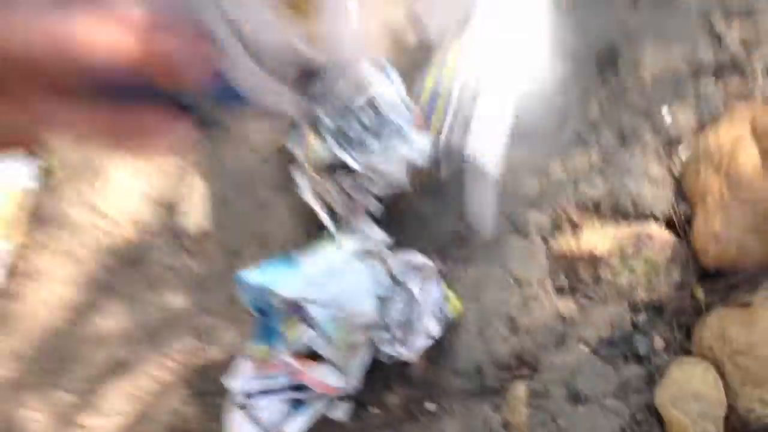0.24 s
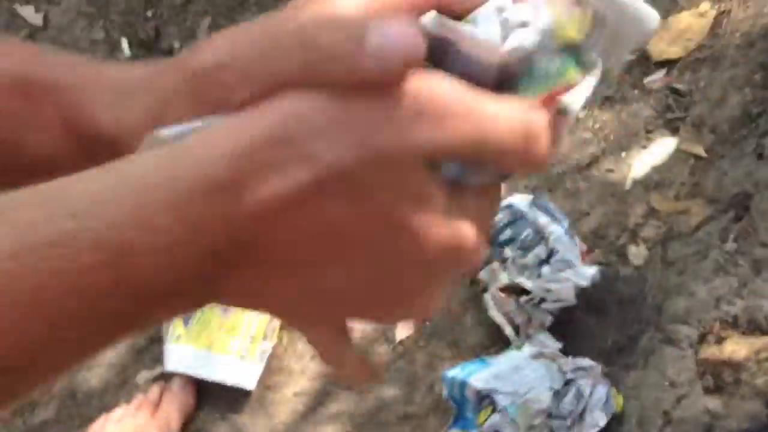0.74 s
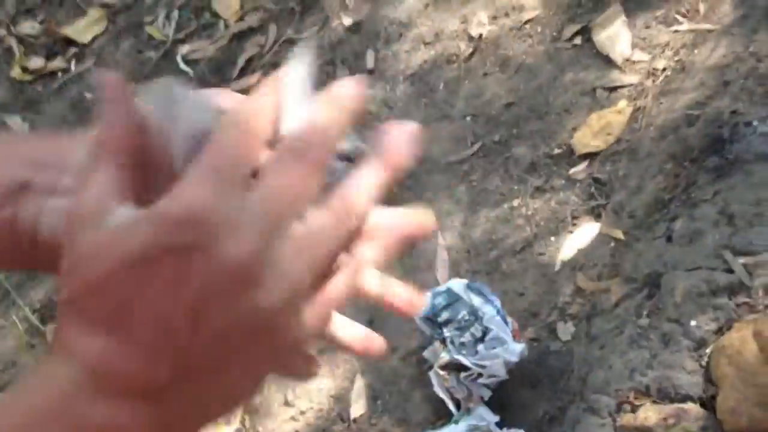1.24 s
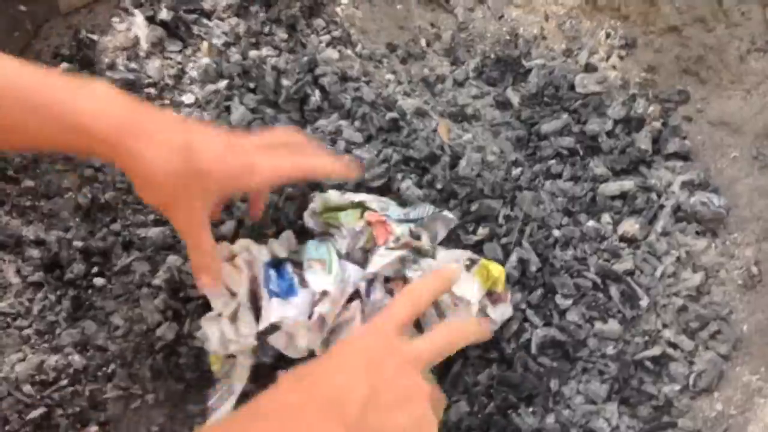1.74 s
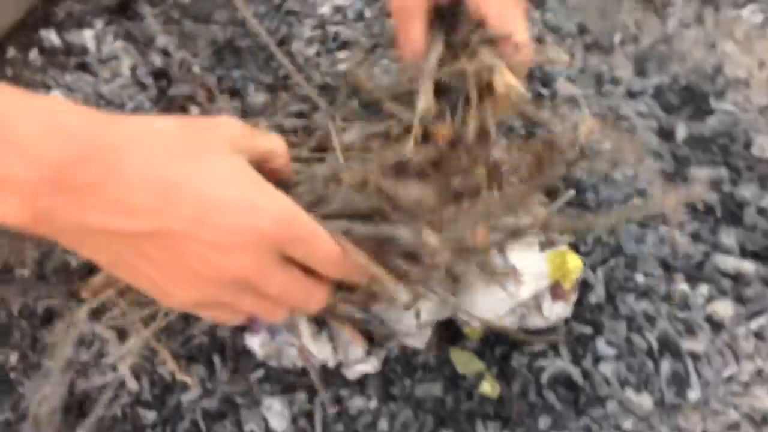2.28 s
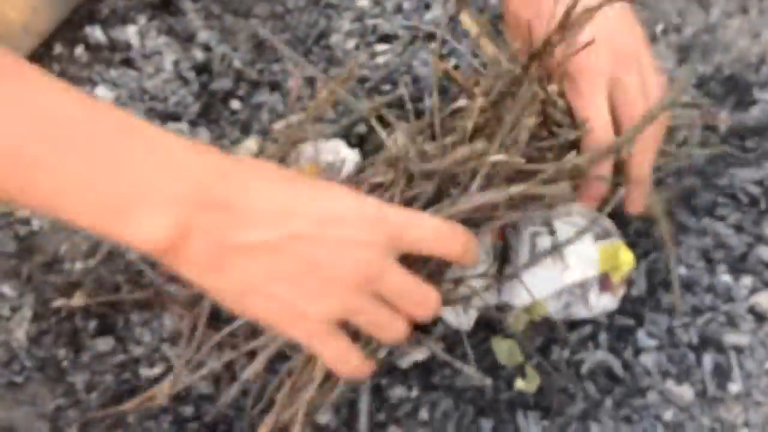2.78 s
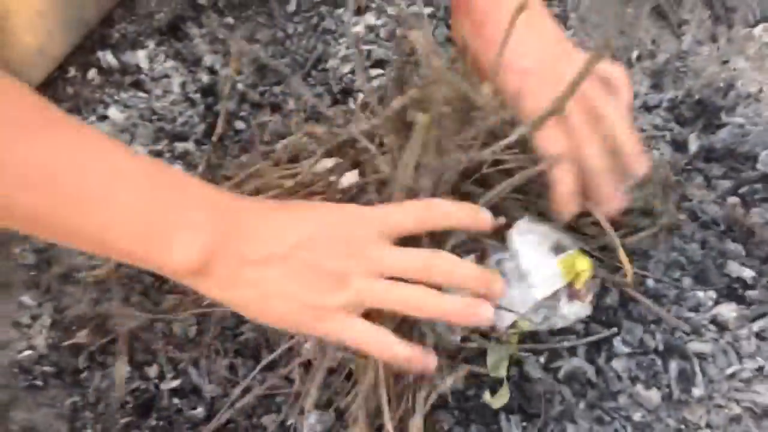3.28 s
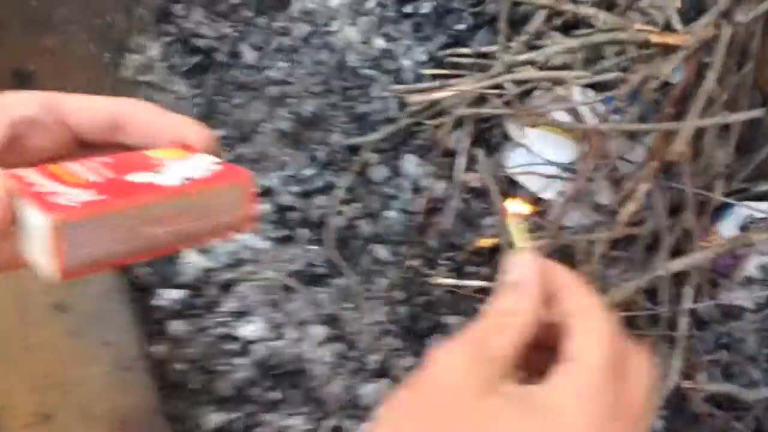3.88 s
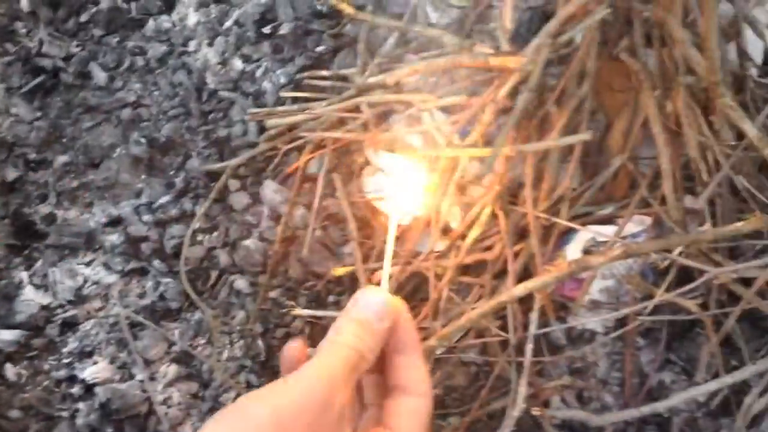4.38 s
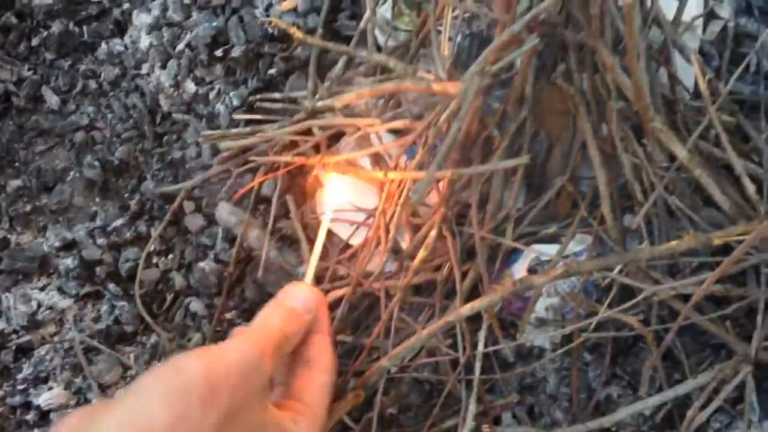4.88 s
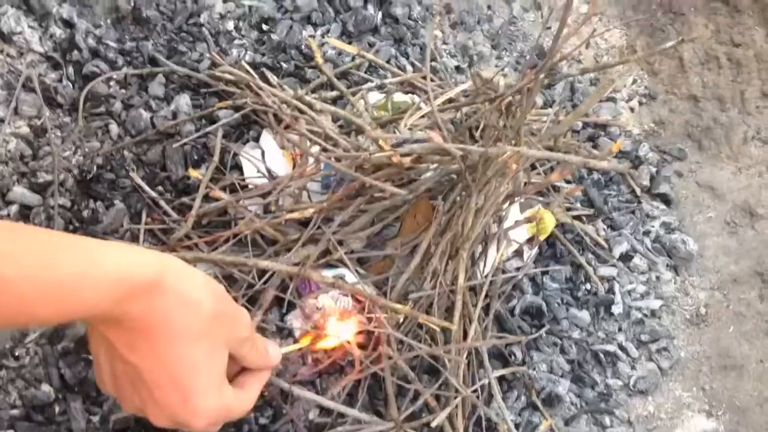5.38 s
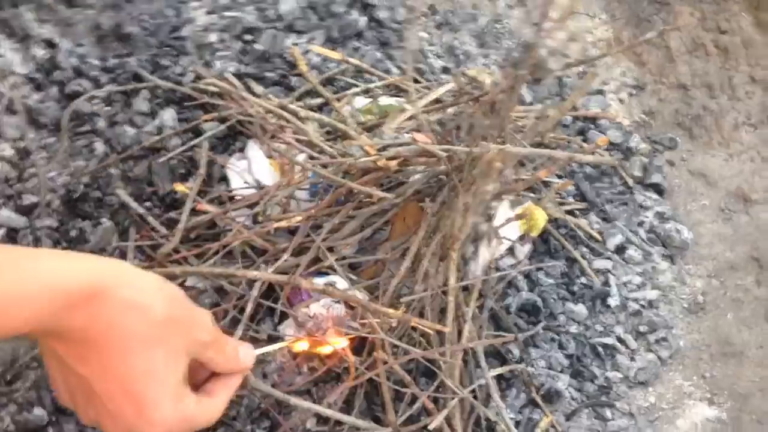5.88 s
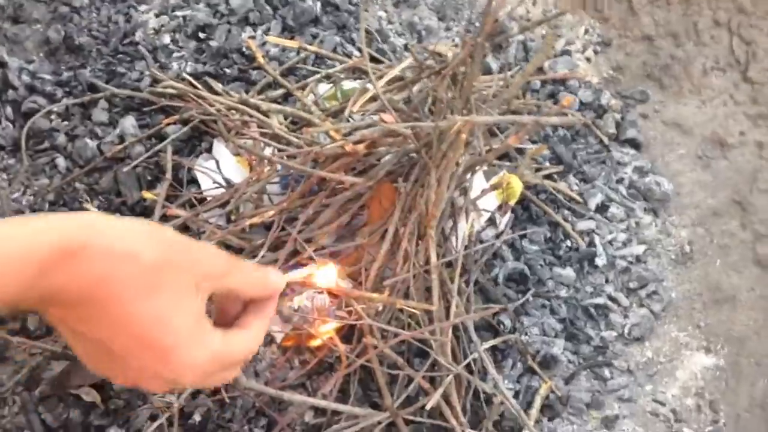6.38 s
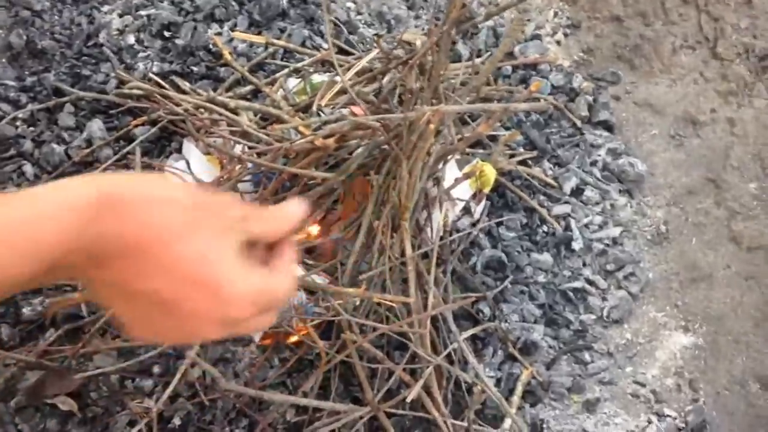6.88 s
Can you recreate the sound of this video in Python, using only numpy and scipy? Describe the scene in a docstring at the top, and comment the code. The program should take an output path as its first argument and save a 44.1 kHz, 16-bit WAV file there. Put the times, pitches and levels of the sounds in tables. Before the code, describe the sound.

Hands crush paper in loud, snapping bursts, then nudge it with a softer rustle. Dry twigs are heaped on top, rubbing and cracking. A match scrapes once across its cardboard box, loose matches knock, and the young flame rasps faintly while small birds chirp far off. Cicadas hiss throughout this summer outdoor scene, and light wind rumbles on the microphone. The sound is mono.

```python
"""Outdoors in summer, in mono: cicadas click into a steady hiss and light wind rumbles on the microphone.
Hands crush paper, then nudge it gently, its folds ringing and its creases snapping. From 2.2 s they
heap dry twigs on it, which rustle and crack. From 3.5 s small birds chirp and chatter far off; at 3.8 s
a match scrapes its cardboard box, loose matches knock and the young flame rasps faintly.
The sound runs in five sections, with a brief dip in level between them."""
import sys
import numpy as np
from scipy import signal
from scipy.fft import rfft, irfft, next_fast_len
from scipy.io import wavfile
from scipy.ndimage import uniform_filter1d

SR = 44100
rng = np.random.default_rng(int(sys.argv[2]) if len(sys.argv) > 2 else 0)


def output_pcm(signal):
    """Save a mono or channel-first signal as 16-bit PCM at the path in sys.argv[1].

    Samples are clipped to [-1, 1] before scaling.
    """
    pcm = np.clip(np.atleast_2d(signal).T, -1, 1) * 32767
    wavfile.write(sys.argv[1], SR, np.round(pcm).astype(np.int16))


N = 314552

# sections of the scene, each lasting until the next: start_s, fade_in_s, fade_out_s
SECTIONS = [(.128, 0.039, 0.11), (1.525, 0.02, 0.0045), (2.248, 0.0023, 0.0042), (3.44, 0.0046, 0.011),
            (5.262, 0.0081, .002)]


def gain_of(db):
    """Decibels to amplitude."""
    return 10 ** (np.asarray(db) / 20)


def unit_rms(x):
    """Scales to rms 1."""
    return x / np.sqrt(np.mean(x ** 2) + 1e-20)


def level_at(spectrum, hz):
    """Level in dB of a spectrum at hz."""
    freq_hz, level_db = np.transpose(spectrum)
    return np.interp(np.log(hz + 1), np.log(freq_hz + 1), level_db)


def add(mix, start_s, sound):
    """Mixes a sound in at start_s."""
    part = mix[round(start_s * SR):][:len(sound)]
    part += sound[:len(part)]


def coloured(x, spectrum):
    """Filters x by a spectrum, rms 1."""
    size = next_fast_len(len(x))
    gains = gain_of(level_at(spectrum, np.fft.rfftfreq(size, 1 / SR)))
    return unit_rms(irfft(rfft(x, size) * gains, size)[:len(x)])


def ring(x, hz, width_hz):
    """One resonance with a peak gain near 1."""
    radius = np.exp(-np.pi * width_hz / SR)
    return 2 * signal.lfilter([1 - radius], [1, -radius * np.exp(2j * np.pi * hz / SR)], x).real


def clicks(size, per_s, spread_db):
    """Random clicks of either sign, rms 1; most are small, a few large."""
    height = gain_of(spread_db * np.minimum(rng.exponential(1, size), 3)) * rng.choice([-1, 1], size)
    return unit_rms(height * (rng.random(size) < per_s / SR))


def wander(size, seconds):
    """Slow random curve, rms 1."""
    span = max(int(seconds * SR), 2)
    return unit_rms(uniform_filter1d(uniform_filter1d(rng.standard_normal(size), span), span))


def powers(t, events):
    """Power of each event: it climbs 20 dB in rise_s to its crest and drops 20 dB in fall_s."""
    crest_s, level_db, rise_s, fall_s = np.transpose(events)[:4, :, None]
    drop_db = 20 * np.maximum((crest_s - t) / rise_s, (t - crest_s) / fall_s)
    return gain_of(2 * (level_db - drop_db)) + 1e-14


def swells_db(t, events):
    """Level of all events together."""
    return 10 * np.log10(powers(t, events).sum(axis=0))


def section_times(index):
    """Sample times of one section."""
    return np.arange(SECTIONS[index][0], SECTIONS[index + 1][0], 1 / SR)


def hollow_body(x, hz, width_hz):
    """An insect's steep-sided body resonance, rms 1."""
    return unit_rms(ring(ring(ring(x, hz, width_hz), hz, 3 * width_hz), hz, 2.6 * width_hz))


def cicadas():
    """Many insects click into their hollow bodies; one lower singer pulses in a steady throb."""
    # course of the song: time_s, chorus_db, lower_singer_db, throb_depth (capped below)
    song = [(.13, -45, -51, .2), (1.27, -42.5, -49, 0.1), (1.5, -43, -54.5, 0), (2.25, -45.5, -51, 0.04),
            (3.4, -44.5, -51, 0.45), (3.55, -45.5, -56, 0.05), (4.2, -45, -54, .7),
            (5.25, -45.5, -55.5, .7), (5.3, -42, -54, .2), (7.13, -43.5, -57.5, 0)]
    # body resonances of the chorus: pitch_hz, width_hz, level_db
    bodies = [(5370, 560, -13), (5730, 960, -7), (7060, 1250, 1), (8320, 700, 1.5), (9160, 500, -5.5)]
    throbs_per_s, throb_crest_s = 6.76, 4.54
    t = np.arange(N) / SR
    time_s, *columns = np.transpose(song)
    chorus_db, lower_db, depth = (np.interp(t, time_s, column) for column in columns)
    chorus = sum(gain_of(db + .83 * wander(N, .037)) * hollow_body(clicks(N, 5000, 2.7), hz, width_hz)
                 for hz, width_hz, db in bodies)
    pulse = np.cos(np.pi * throbs_per_s * (t - throb_crest_s)) ** 4
    throb = 1 + np.clip(depth, 0, .6) * (2 * pulse - 1)
    lower_singer = hollow_body(clicks(N, 4000, 3.2), hz=5050, width_hz=480)
    return gain_of(chorus_db) * unit_rms(chorus) + gain_of(lower_db) * throb * lower_singer


def wind():
    """Wind buffets the microphone: a lumpy rumble with slow lulls and short gusts."""
    # colour of the rumble: freq_hz, level_db
    rumble = [(12, -68), (20, -19), (64, -5.5), (91, 3.5), (206, -13.5), (323, -30), (400, -27.5),
              (520, -78), (880, -120)]
    # gusts: crest_s, level_db
    gusts = [(.19, -61), (.45, -49), (.56, -43), (.68, -43.5), (1.22, -57), (1.57, -50), (1.71, -55),
             (1.87, -54), (2.8, -65), (3.09, -54), (3.38, -54), (3.8, -53), (4.05, -50), (4.4, -52),
             (5.02, -50), (5.49, -49), (5.63, -51), (5.9, -47), (6.23, -53)]
    steady_db, lull_db, rise_s, fall_s = -57.5, 1.2, .065, .12
    gust_db = swells_db(np.arange(N) / SR, [(crest_s, db, rise_s, fall_s) for crest_s, db in gusts])
    strength = np.hypot(gain_of(steady_db + lull_db * wander(N, .11)), gain_of(gust_db))
    lumps = gain_of(2.2 * wander(N, .028))
    return strength * lumps * coloured(rng.standard_normal(N), rumble)


def open_air():
    """A faint wash of far leaves and open air that follows the breeze."""
    # colour of the wash: freq_hz, level_db
    wash = [(60, -10), (200, -2.5), (325, 0), (1200, -6.5), (2100, -9), (4200, -10.5), (10000, -17),
            (11000, -30), (13000, -4.5), (15500, -23)]
    # strength of the breeze: time_s, level_db
    breeze = [(3.46, -62.5), (4.0, -61.5), (5.2, -62.5), (5.4, -62), (6.4, -60), (7.13, -62.5)]
    level_db = np.interp(np.arange(N) / SR, *np.transpose(breeze)) + .92 * wander(N, .038)
    return gain_of(level_db) * coloured(rng.standard_normal(N), wash)


def flurries(size, per_s, decay_s):
    """Sudden starts that die away, rms 1: one fold giving way sets off its neighbours."""
    kicks = abs(clicks(size, per_s, spread_db=2.4))
    return unit_rms(signal.lfilter([1], [1, -np.exp(-1 / (decay_s * SR))], kicks))


def rustle(t, gestures, colour, per_s, spread_db, crack, steadiness, rub):
    """Small folds each ring at their own pitch; cracks shake all bands at once; surfaces also rub."""
    pivot_hz = 2000  # treble and bass tilt away from here
    effort_db = swells_db(t, gestures)
    # the tilts of all gestures blend, each weighted by its share of the power
    treble_tilt, bass_tilt = np.transpose(gestures)[4:] @ powers(t, gestures) / gain_of(2 * effort_db)
    cracks = clicks(len(t), per_s, spread_db)
    out, mid_power = np.zeros(len(t)), 0
    for hz in np.geomspace(150, 15000, num=24):
        folds = clicks(len(t), .3 * per_s * np.sqrt(hz / pivot_hz), spread_db)
        band = ring(crack * cracks + folds + rub * rng.standard_normal(len(t)), hz, .16 * hz)
        level = gain_of(level_at(colour, hz))
        mid_power += level ** 2 * hz * (500 < hz < 4200)
        octaves = np.log2(hz / pivot_hz)
        tilt_db = np.where(octaves > 0, treble_tilt * octaves, -bass_tilt * octaves)
        flicker_db = 3 * wander(len(t), .015)  # each fold sounds in its own moments
        out += level * unit_rms(band) * np.sqrt(hz) * gain_of(flicker_db + tilt_db)
    bursts = unit_rms(steadiness + flurries(len(t), per_s=150, decay_s=.003))
    return out / np.sqrt(mid_power) * gain_of(effort_db) * bursts


def paper():
    """Hands crush paper hard so its folds give way in bursts, then nudge it into a smoother rustle."""
    # colour of the paper: freq_hz, level_db
    colour = [(88, -40), (150, -6), (326, -10.5), (500, 2.5), (607, -2), (1240, 3.5), (1730, 6),
              (3220, 6.5), (11400, -9), (15500, -46)]
    # squeezes: crest_s, effort_db, rise_s, fall_s, treble_db_per_octave, bass_db_per_octave
    squeezes = [(.17, -48, 0.091, 0.24, -8, 1), (.248, -28.5, 0.16, 0.1, 0.7, 2),
                (.36, -37.5, 0.13, 0.14, -0.5, -2), (.435, -31.5, 0.06, 0.08, 2, -1.5),
                (.49, -36, 0.07, 0.11, 2, -0.5), (0.547, -35, 0.1, 0.042, 1.5, 0),
                (0.639, -29, .06, 0.057, -2, 2.5), (0.679, -28, 0.087, 0.077, 0, 1),
                (0.766, -36, 0.044, 0.063, 3.5, -7), (.835, -31, 0.076, 0.09, -2, 2),
                (.885, -36.5, .06, .09, 1, -1), (.93, -36, .06, .08, 2, -2), (1.0, -36, .09, .06, 1, -4),
                (1.04, -47, .05, .2, 2, -4), (1.232, -37, .05, .04, -1.5, -6.5),
                (1.262, -43, .04, .04, 3, -6), (1.335, -49, .04, .06, 2, -3),
                (1.372, -43, .04, .04, -1, -1.5), (1.425, -39.5, 0.068, .07, 0.1, -10),
                (1.61, -48.5, 0.25, .16, 2.5, 3), (1.738, -50, 0.016, 0.02, -5, 1),
                (1.88, -51.5, .035, .14, 1.5, 2), (1.952, -47.5, 0.12, 0.12, 1.5, 1),
                (2.085, -54, 0.053, 0.14, 2, 2.5)]
    out = np.zeros(N)
    t = section_times(0)
    crush = rustle(t, squeezes, colour, per_s=2500, spread_db=3.5, crack=.45, steadiness=1.8, rub=.4)
    add(out, t[0], crush)
    t = section_times(1)
    nudge = rustle(t, squeezes, colour, per_s=3000, spread_db=2.5, crack=.3, steadiness=4, rub=1)
    add(out, t[0], nudge)
    return out


def snap(splinter_s, hz, treble_db):
    """A blow and its splinters ring one fold; torn fibres add a treble tick. Peak 1."""
    t = np.arange(400) / SR
    burst = rng.standard_normal(len(t)) * np.exp(-2 * t / splinter_s)
    burst[:2] += [4, 2]  # the blow
    fold = unit_rms(ring(ring(burst, hz, .3 * hz), hz, hz))
    tick = unit_rms(ring(burst, hz=10500, width_hz=7000))
    sound = fold + gain_of(treble_db) * tick
    return sound / abs(sound).max()


def snaps():
    """The loudest creases buckle, then twigs crack; wood splinters for longer than paper."""
    # single creases and cracks: start_s, peak_db, pitch_hz, treble_db
    breaks = [(0.2238, -15, 4350, -7), (0.2545, -8, 4520, -5), (0.2926, -19, 6330, -4),
              (0.3176, -13, 3400, -6), (0.3528, -14, 3230, -4), (0.3689, -19, 2200, -13),
              (0.411, -19, 2110, -14), (0.4324, -16, 1340, -7), (0.4602, -18, 4180, -7),
              (0.4962, -16, 7150, -2), (0.5136, -15, 3920, -3), (0.5471, -15, 3450, -11),
              (0.6342, -9, 1850, -17), (0.6632, -14, 1510, -9), (0.6927, -12, 3230, -8),
              (0.7414, -12, 3190, -4), (0.7576, -20, 1810, -9), (0.7702, -11, 3360, -4),
              (0.833, -14, 2020, -7), (0.8432, -16, 1550, -9), (0.8496, -17, 2330, -12),
              (0.8815, -19, 3100, -7), (0.9243, -19, 7020, -4), (0.9973, -10, 3190, -16),
              (1.0098, -11, 2500, -16), (1.0201, -17, 1890, -3), (1.2085, -23, 3490, -4),
              (1.2325, -16, 3230, -15), (1.2613, -23, 5080, -3), (1.3718, -22, 1340, -15),
              (1.4179, -21, 4220, -10), (2.3491, -29, 3230, -8), (2.3846, -22, 2930, -13),
              (2.6734, -27, 2020, -11), (2.766, -24, 3200, -7), (2.817, -23, 3920, -7),
              (2.8587, -24, 1940, -7), (3.157, -28, 2500, -8), (3.2875, -22, 2370, -3)]
    paper_splinter_s, wood_splinter_s, twigs_start_s = .0008, .0016, SECTIONS[2][0]
    out = np.zeros(N)
    for start_s, peak_db, pitch_hz, treble_db in breaks:
        splinter_s = paper_splinter_s if start_s < twigs_start_s else wood_splinter_s
        add(out, start_s, gain_of(peak_db) * snap(splinter_s, pitch_hz, treble_db))
    return out


def twigs():
    """Dry twigs rub and crackle with each push on the heap."""
    # colour of the twigs: freq_hz, level_db
    colour = [(88, -35), (150, 2), (189, -3.5), (225, -6), (796, -4.5), (1020, -9), (1910, -2.5),
              (3280, -3), (8830, -9), (15500, -20.5)]
    # pushes: crest_s, effort_db, rise_s, fall_s, treble_db_per_octave, bass_db_per_octave
    pushes = [(2.26, -48, .05, .1, .5, .5), (2.315, -45, .04, .1, .5, .5),
              (2.39, -42.5, .15, 0.26, .5, -1.2), (2.49, -45, 0.17, 0.13, .5, -1.4),
              (2.63, -45, 0.19, 0.055, 1, -1.3), (2.766, -38.5, 0.16, 0.098, -1.1, 1),
              (2.81, -39, 0.13, .07, -1.6, 1), (2.86, -44, 0.056, 0.11, .5, -1.1),
              (3.0, -50, 0.38, 0.12, 1, 0.11), (3.09, -49.5, 0.11, 0.15, 1, 0.28),
              (3.191, -39.5, 0.055, 0.099, -0.6, .5), (3.235, -36.5, 0.12, 0.14, -0.58, 0.13),
              (3.36, -48.5, 0.17, 0.22, .5, 0.41)]
    out, t = np.zeros(N), section_times(2)
    add(out, t[0], rustle(t, pushes, colour, per_s=2000, spread_db=3.5, crack=.3, steadiness=4, rub=.7))
    return out


def rasp():
    """Far chattering birds and the young flame: narrow, fuzzy voices come and go inside each swell."""
    # faint raspy swells: crest_s, level_db, rise_s, fall_s
    bursts = [(3.6, -58.5, 0.15, 0.35), (4.08, -51, 0.5, 0.26), (4.27, -59.5, 0.22, 0.97),
              (4.63, -62.5, .06, .05), (4.78, -54, 0.18, .3), (5.29, -62, 0.054, 0.46),
              (5.55, -54.5, 0.39, .5), (5.76, -57, .1, 0.93), (6.12, -56, .04, 0.36),
              (6.42, -61, .05, 0.58), (6.7, -57, 0.073, 0.27), (7.07, -58, 0.22, .4)]
    # colour of the rasp: freq_hz, level_db
    colour = [(700, -35), (1200, -2), (2200, 4), (3300, 4), (4000, 8), (9000, 4), (14000, -30)]
    fizz = rng.standard_normal(N)
    voices = sum(gain_of(level_at(colour, hz) + 5 * wander(N, .025)) * ring(fizz, hz, width_hz=160)
                 for hz in np.linspace(1200, 4500, num=14))
    texture = unit_rms(unit_rms(voices) + .19 * coloured(fizz, colour))
    return gain_of(swells_db(np.arange(N) / SR, bursts)) * texture


def birds():
    """Gliding, hoarse whistles, smeared by echoes among trees."""
    # chirps: start_s, length_s, start_hz, end_hz, level_db
    chirps = [(3.549, .07, 2000, 2055, -62.5), (3.564, .055, 3800, 3780, -54.5),
              (3.59, 0.098, 2830, 2760, -61), (4.012, 0.049, 2880, 3010, -56),
              (4.024, 0.06, 3980, 4050, -55), (4.747, 0.059, 2610, 2780, -56.5),
              (4.867, .039, 2380, 2380, -60), (5.269, .045, 2790, 2720, -58.5),
              (5.513, 0.054, 2760, 2840, -51.5), (5.545, .05, 3880, 3960, -54.5),
              (5.597, 0.056, 2820, 2700, -55), (5.672, .03, 2600, 2820, -59),
              (5.725, 0.037, 3680, 3870, -56), (5.753, .025, 4080, 4060, -55),
              (5.784, .02, 2830, 2880, -58), (6.099, .045, 3760, 3790, -54.5),
              (6.124, .025, 4030, 4120, -57), (6.15, .035, 2770, 2750, -63), (6.4, 0.056, 3540, 3575, -63),
              (6.544, 0.06, 2550, 2520, -64), (6.689, 0.025, 3600, 3680, -50),
              (6.768, .045, 3640, 3520, -61), (6.782, 0.0099, 2200, 2200, -59),
              (6.905, .13, 2626, 3010, -56), (7.063, .035, 3590, 3680, -51.5)]
    reverb_s, echo_db = .48, -3
    out = np.zeros(N)
    for start_s, length_s, start_hz, end_hz, level_db in chirps:
        size = int(length_s * SR)
        pitch_hz = np.linspace(start_hz, end_hz, size) + 55 * wander(size, .004)
        whistle = np.sin(2 * np.pi * np.cumsum(pitch_hz) / SR)
        flutter = gain_of(3 * wander(size, .005))
        add(out, start_s, gain_of(level_db) * flutter * whistle * signal.windows.tukey(size, .6))
    t = np.arange(SR // 3) / SR
    trees = rng.standard_normal(len(t)) * gain_of(-60 * t / reverb_s)
    return out + gain_of(echo_db) * signal.oaconvolve(out, trees / np.linalg.norm(trees))[:N]


def match():
    """The head bites, drags over grit that rings the box and leaves sputtering; loose matches knock."""
    # colour of the striker's grit: freq_hz, level_db
    grit = [(180, -48), (300, -38.5), (922, -1), (1490, -27), (1870, -11), (3130, -4.5), (12300, -8),
            (15500, -15)]
    # cardboard modes of the box: pitch_hz, width_hz, level_db
    box_modes = [(595, 110, -9), (894, 90, 8), (1053, 100, 9), (1465, 120, 12), (2140, 200, 4),
                 (2575, 150, -8), (3160, 150, 6)]
    # loose matches tapping the box: start_s, level_db
    taps = [(3.893, -39), (3.903, -43), (3.919, -43)]
    touch_s, leave_s = 3.778, 3.8025
    bite_s, lift_s, sputter_s = .007, .004, .026  # bite and lift span 20 dB
    out, knocks = np.zeros(N), np.zeros(N)
    t = np.arange(touch_s - 2 * bite_s, leave_s + sputter_s, 1 / SR)
    drag_db = -24 - 20 * np.maximum(0, np.maximum((touch_s - t) / bite_s, (t - leave_s) / lift_s))
    sputter_db = -43.5 - 5 * (t - leave_s) / sputter_s
    drive_db = np.where(t > leave_s, np.maximum(drag_db, sputter_db), drag_db)
    # the head speeds up on its way, and the box pitch it drives best climbs with it
    driven_hz = np.interp(np.maximum(t - touch_s, 0) ** 2, [0, (leave_s - touch_s) ** 2], [820, 1650])
    slips = clicks(len(t), per_s=5000, spread_db=3.7) + .59 * rng.standard_normal(len(t))
    add(out, t[0], gain_of(drive_db - 3) * coloured(slips, grit))
    for start_s, level_db in taps:
        add(knocks, start_s, gain_of(level_db) * rng.standard_normal(300) * np.hanning(300))
    for pitch_hz, width_hz, level_db in box_modes:
        coupling_db = 7.5 - 19 * abs(np.log2(pitch_hz / driven_hz))
        blows = knocks.copy()
        add(blows, t[0], gain_of(drive_db + coupling_db) * slips)
        out += gain_of(level_db) * ring(blows, pitch_hz, width_hz)
    return out


def scene():
    """The fire-making and its summer backdrop, the same in both channels."""
    mono = paper() + twigs() + snaps() + match() + rasp() + cicadas() + birds() + wind() + open_air()
    return np.array([mono, mono])


def record(dry):
    """Each section fades in, and out before the next; a steep low-pass trims the top treble."""
    cutoff_hz = 15620
    t = np.arange(N) / SR
    start_s, fade_in_s, fade_out_s = np.transpose(SECTIONS)[..., None]
    end_s = np.append(start_s[1:], [[N / SR + 1]], axis=0)
    fades = np.clip(np.minimum((t - start_s) / fade_in_s, (end_s - t) / fade_out_s), 0, 1).sum(axis=0)
    low_pass = signal.firwin(511, cutoff_hz, window=("kaiser", 10), fs=SR)
    return signal.oaconvolve(dry * fades, low_pass[None], "same")


dry = scene()
out = record(dry)
output_pcm(out)
```